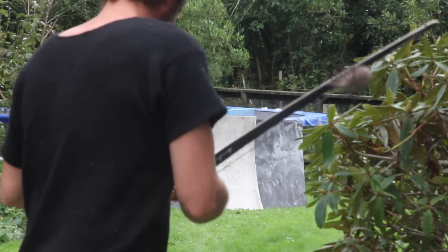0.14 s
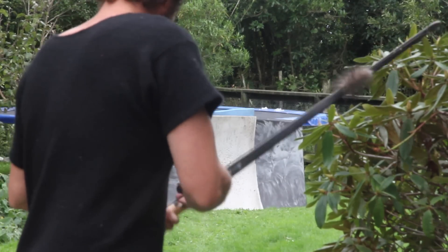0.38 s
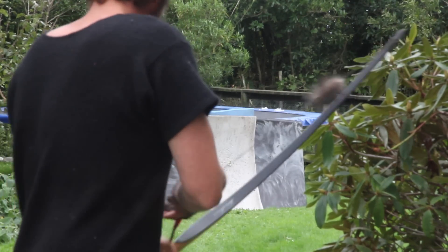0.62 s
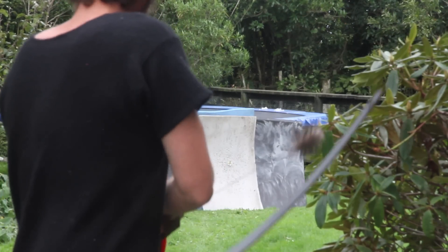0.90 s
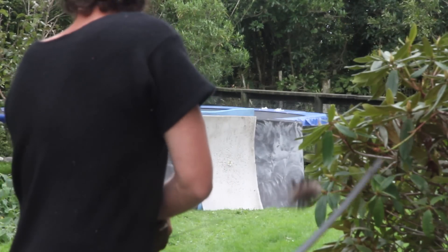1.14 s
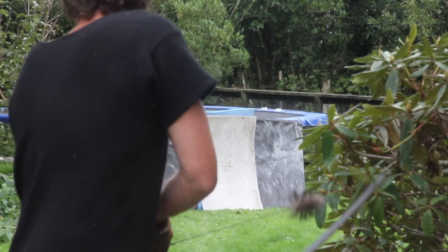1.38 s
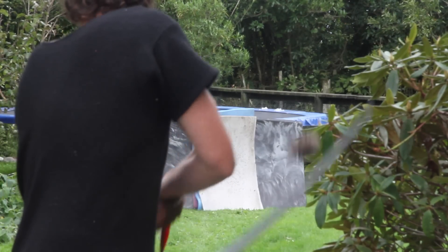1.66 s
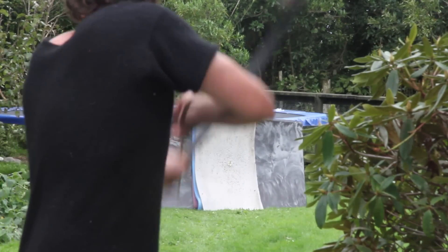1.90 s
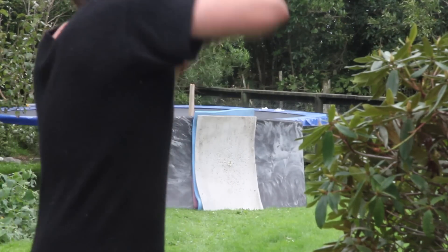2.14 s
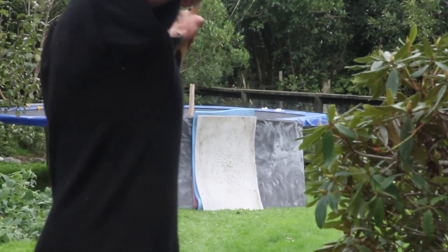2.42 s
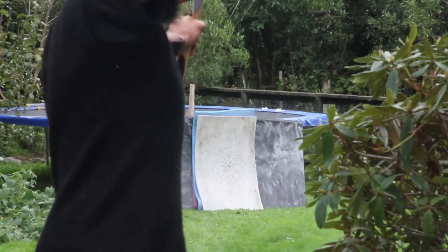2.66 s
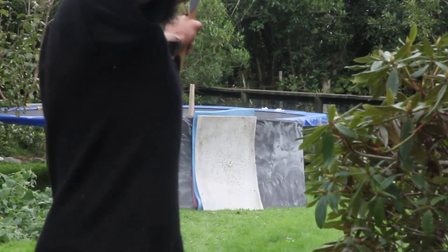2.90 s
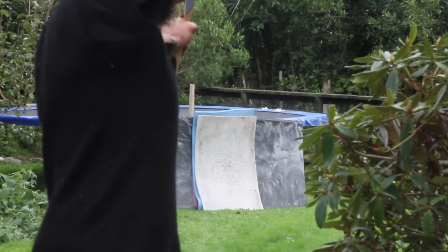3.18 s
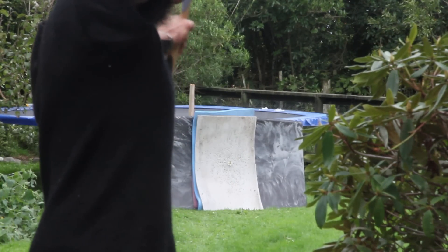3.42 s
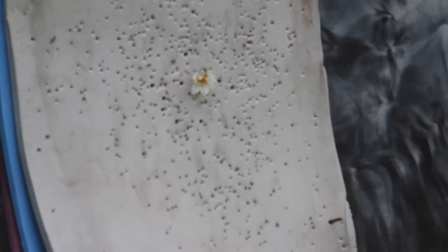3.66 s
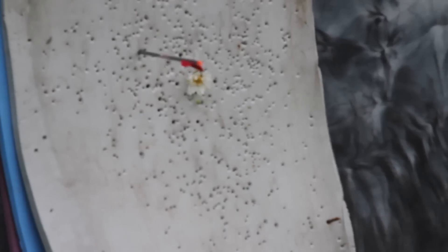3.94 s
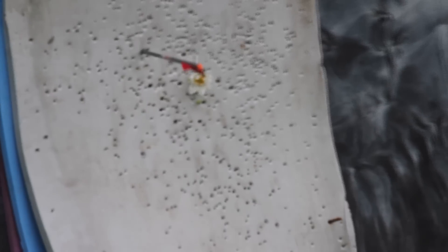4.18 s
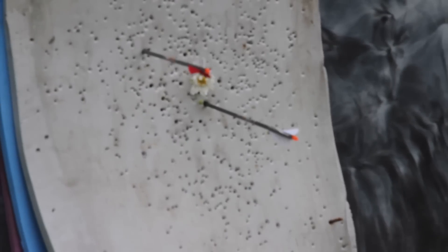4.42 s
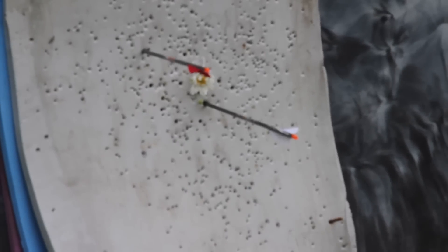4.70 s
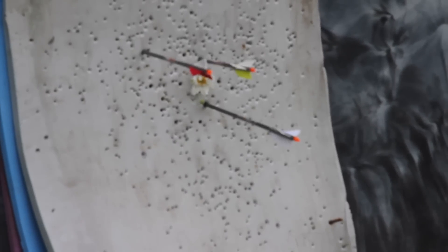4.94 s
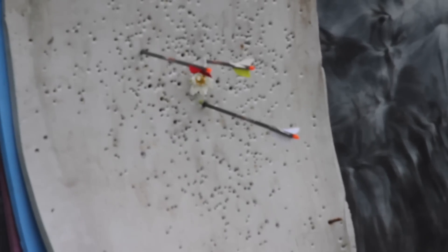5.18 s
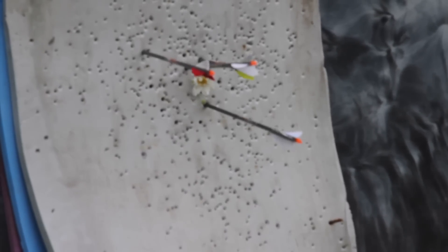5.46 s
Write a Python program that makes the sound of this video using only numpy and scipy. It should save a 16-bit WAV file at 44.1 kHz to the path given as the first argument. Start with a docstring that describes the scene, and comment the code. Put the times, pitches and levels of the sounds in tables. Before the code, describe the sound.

In a quiet garden with faint far wind and traffic, an archer's clothing and arrow fletchings rustle and snap dryly, wood and nocks tick and knock, then fall nearly quiet. The string releases with a loud sharp crack. After an abrupt cut, an arrow smacks into the target close to the microphone, overloading it, while wind hisses, thumps and tears, easing and then surging again at the end.

```python
"""Cloth rustles and snaps, wood and nocks tick, and a string is loosed as an archer handles a bow in a garden.
After a cut at 3.74 s, close to the butt, an arrow smacks in and overloads the input while gusts hiss and thump.
Handling is shaped noise and noise bursts; wood and butt are noise rung through damped modes, or decaying sines.
Wind is fluttering hiss, short uneven low swings, pressure steps and lumpy rumble over banded garden noise."""
import sys
import numpy as np
from scipy import signal
from scipy.io import wavfile

SR = 44100
rng = np.random.default_rng(int(sys.argv[2]) if len(sys.argv) > 2 else 0)


def to_wav(sig):
    """Store sig (one row per channel, or 1-D mono) as 16-bit WAV at the path in sys.argv[1].

    Samples outside -1..1 are clipped; the rate is SR.
    """
    pcm = np.clip(np.atleast_2d(sig), -1, 1) * 32767
    pcm = np.round(pcm).astype(np.int16)
    wavfile.write(sys.argv[1], SR, pcm.T)  # frames by channels


def rack_gain(trim_db):
    """Turn a fader trim in dB into the linear factor to multiply a signal by."""
    fader = np.asarray(trim_db, float)
    return 10 ** (fader / 20)


N = 246078  # samples

# Knocks of bow, string and shafts, before the part gains.
# Each row: start in seconds, level in dB, woody part in dB re level, bright part in dB re level.
KNOCKS = [(0.2807, -35.5, 2, -14), (0.2954, -35, 4.5, -16), (1.0248, -35, 2.5, -17),
          (1.1548, -28.5, -6, -41), (1.232, -31.5, -12, -27), (1.4805, -46, 12, -18),
          (1.4953, -34, 6.5, -22), (1.582, -21.5, 3.5, -6.5), (1.595, -24, -8, -24), (1.6219, -29, -3, -18),
          (1.6329, -27, -10, -5.5), (1.735, -35.5, 3, -17), (1.835, -20, -7, -11), (1.858, -23, -6.5, -21),
          (1.9295, -26, -10, -11), (1.9604, -24, -3.5, -27), (1.9688, -18.5, -9, -33),
          (2.001, -23, -5, -27), (2.0298, -21.5, -20, -33), (2.188, -27.5, -5, -15),
          (2.2477, -26, -12.5, -32), (2.3152, -30.5, -4, -8), (2.7194, -30, -25, -1.5),
          (3.107, -35, -11, -3.5), (3.469, -19.5, -9, 5), (3.478, -6.5, -2.5, -4.5),
          (3.486, -11.5, -28, -1.5)]
KNOCK_T60_S = 0.028
# Modes of the wooden stave. Each row: frequency in Hz, gain in dB, t60 in seconds.
STAVE_MODES = [(900, 0, .012), (1150, -1, .014), (1500, 0, .01), (1850, -3, .008), (2300, -3, .008)]
# Small hollow knocks with one clear pitch. Each row: start in seconds, peak in dB, frequency in Hz.
HOLLOW_KNOCKS = [(1.0248, -31, 1050), (1.4802, -33, 1290), (1.5821, -19, 890), (1.734, -34, 800),
                 (3.1057, -24, 1130)]
HOLLOW_T60_S = 0.027
# The limbs jolt back as the string stops.
# Each row: start in seconds, level in dB, frequency in Hz, t60 in seconds.
LIMB_JOLT = [(3.4802, -10.5, 306, 0.028)]
# Arrow into the butt and its echoes. Each row: start in seconds, push level in dB.
ARROW_HITS = [(3.9152, 1), (3.93, -22), (3.934, -20), (3.945, -25.5), (3.954, -25)]
# Modes of the butt. Each row: frequency in Hz, gain in dB, t60 in seconds.
BUTT_MODES = [(1000, -1, .008), (1400, -7, .006), (2000, -3, .008), (2240, -6, .012), (2950, -7, .006),
              (4200, -2, .005), (6600, -10, .004)]
# Dry bright snaps of cloth and fletching. Each row: start in seconds, noise level in dB, centre in Hz.
CLOTH_SNAPS = [(0.0564, -36, 12000), (0.1674, -33, 7000), (0.3345, -23.5, 9000), (0.372, -25.5, 8000),
               (0.3984, -20, 9250), (0.4114, -24, 9000), (0.4286, -28, 9000), (0.4834, -19, 6900),
               (0.5114, -22, 9500), (0.5205, -16.5, 8900), (0.5682, -23, 13000), (0.6978, -27.5, 8000),
               (0.7442, -23.5, 6000), (0.772, -22, 7000), (0.8138, -27.5, 9900), (2.031, -18.5, 5940),
               (2.09, -37, 6500), (2.118, -39, 10100), (2.1655, -28, 7850)]
SNAP_SPREAD, SNAP_T60_S, SNAP_TAIL_DB = 1.39, 0.0051, -12  # centre-to-edge ratio, fade, scrapy tail
# Hands at work, with faint crackles at random. Each row: start in seconds, end in seconds.
BUSY_HANDS = [(.2, .9), (1.8, 2.35)]
CRACKLES_PER_S, CRACKLE_FLOOR_DB = 40, -36
# Strokes of sleeve, shaft and string, before the flutter.
# Each row: peak in seconds, level in dB, brighter part in dB re level, rise in seconds, t60 in seconds.
HAND_STROKES = [(0.28, -48.5, -10, 0.12, 1.1), (0.58, -45.5, 4.5, 0.44, 0.68),
                (0.77, -50.5, 4.5, 0.39, 0.47), (0.923, -47, 17, .008, 0.46), (0.945, -40.5, 9, .05, 0.26),
                (1.34, -48, -4, 0.23, 0.24), (1.5, -47, -13, .07, .5), (1.63, -39.5, -3, 0.091, .35),
                (1.84, -35, -10, .03, 0.27), (1.96, -40.5, -25, 0.035, 1.5), (2.11, -54, -9, .1, 1.4),
                (3.463, -25.5, -6.5, .006, 0.32), (3.484, -27, 0, 0.042, 0.11)]
STROKE_RISE_DB, SHEEN_SLOPE_RATIO = 29.5, 1.9  # climb over the rise; brighter part's dB slope re the duller
# Wind hiss in the leaves near the butt, before drops and flutter; close rows are sudden steps.
# Each row: time in seconds, level in dB.
GUST_HISS = [(3.74, -56), (3.744, -35), (3.79, -41), (3.85, -39.5), (3.91, -27.5), (3.99, -33),
             (4.085, -32.5), (4.138, -30), (4.145, -28), (4.2, -28.5), (4.31, -35), (4.315, -39),
             (4.5, -44.5), (4.75, -47.5), (4.79, -42), (4.92, -43.5), (5.178, -41), (5.183, -37.5),
             (5.23, -34.5), (5.298, -36), (5.303, -40), (5.58, -40.5)]
GUST_SHEEN_DB, GUST_TEAR_DB = -3, -1  # re the hiss
# The hiss drops away for a moment after the hardest blows.
# Each row: start in seconds, end in seconds, level change in dB.
HISS_DROPS = [(3.922, 3.963, -11), (4.023, 4.083, -13), (5.371, 5.42, -18), (5.483, 5.59, -12)]
LEAVES_DB, LEAVES_SHEEN_DB = -54, -58.5  # faint steady leaves, duller and brighter part, before the flutter
# Wind thumps on the diaphragm, before trim and random wander of level and pitch.
# Each row: centre in seconds, level in dB, swing in Hz, width in milliseconds, tearing in dB.
WIND_THUMPS = [(3.64, -33, 116, 11.5, -65), (3.77, -11.5, 154.7, 27, -34.5), (3.818, -13.5, 186, 6.9, -49),
               (3.836, -21, 159, 14.5, -45), (3.874, -10, 131, 10.3, -36), (3.903, -7, 187.7, 13.5, -32),
               (3.958, -19.5, 234, 9.4, -33), (4.038, -4.5, 373.4, 21.4, -22),
               (4.071, -9.5, 187, 12, -32.5), (4.097, -8, 376, 9, -40), (4.11, -7.5, 148, 13, -40),
               (4.27, -19, 94, 16, -51), (4.303, -16.5, 178, 7.3, -44), (4.385, -11.5, 137, 15.2, -50),
               (4.427, -24.5, 132, 12.4, -51), (4.482, -13.5, 146.3, 13.3, -37),
               (4.608, -28, 129, 10.4, -40), (4.645, -31.5, 137.5, 16, -39), (4.814, -21, 131, 10.3, -41),
               (4.851, -22, 131, 11.8, -38.5), (5.138, -13, 160, 7.6, -44), (5.309, -19.5, 154, 14, -50),
               (5.365, -6.5, 223, 10.6, -23.5), (5.437, -11.5, 166.4, 11, -52), (5.487, -3, 252, 15.5, -38),
               (5.513, -6.5, 260, 12.1, -23), (5.533, -9, 299, 9.7, -13.5), (5.555, -9.5, 183, 11.9, -19)]
FAINT_THUMPS, FAINT_FROM_S, FAINT_FLOOR_DB, FAINT_WIDTH_MS = 10, 3.7, -39, 11  # scattered at random
# Sudden pressure jumps at the front of a gust, before softening.
# Each row: start in seconds, level in dB, decay time constant in milliseconds.
PRESSURE_JUMPS = [(3.905, -6.5, 0.87), (4.372, -17, 2.0), (5.132, -15, 0.98), (5.361, -11, 3.2),
                  (5.482, 6.5, 1.4), (5.5167, -10.5, 1.3), (5.539, -12, 0.67)]
# Low wind rumble, before a trim. Each row: time in seconds, level in dB.
WIND_RUMBLE = [(3.6, -54), (3.774, -20), (3.802, -26), (3.902, -16.5), (3.94, -29), (4.126, -24.5),
               (4.17, -42), (4.286, -24.5), (4.33, -54), (4.386, -24), (4.424, -35.5), (4.782, -41.5),
               (4.852, -29), (4.99, -54), (5.156, -25), (5.21, -48), (5.496, -32), (5.575, -15.5)]
# Tone of the far garden. Each row: frequency in Hz, relative density in dB per Hz.
GARDEN_TONE = [(18, -45), (30, -22), (91, 0), (151, -7.5), (315, 2), (401, 0), (448, -0.5), (639, -4.5),
               (798, -4.5), (2070, -17), (6000, -38), (7800, -55), (13200, -120)]
GARDEN_DB = -39.5  # rms, before the small shelter trim


def rms_one(x):
    """Scale to rms 1."""
    return x / np.sqrt(np.mean(x ** 2) + 1e-20)


def in_time(rows):
    """Columns of a curve, interpolated sample by sample."""
    s, *columns = np.transpose(rows)
    return [np.interp(np.arange(N) / SR, s, column) for column in columns]


def band(x, low_hz, high_hz, order=2):
    """Butterworth band-pass."""
    edges = [low_hz, min(high_hz, .45 * SR)]
    return signal.sosfilt(signal.butter(order, edges, "band", fs=SR, output="sos"), x)


def drift(rate):
    """Slow random wander of spread about 1: noise through two equal poles, drawn every 40 samples."""
    pole = np.exp(-80 * np.pi * rate / SR)
    noise = rng.standard_normal(N // 40 + 2002)
    slow = signal.lfilter([1], [1, -2 * pole, pole * pole], noise)[2000:]
    return np.interp(np.arange(N) / 40, np.arange(len(slow)), rms_one(slow - slow.mean()))


def ring(x, modes):
    """Parallel damped modes of one body."""
    out = np.zeros(N)
    for hz, db, t60 in modes:
        radius = rack_gain(-60 / (t60 * SR))
        angle = 2 * np.pi * hz / SR
        poles = [1, -2 * radius * np.cos(angle), radius * radius]
        out += rack_gain(db) * signal.lfilter([0, np.sin(angle)], poles, x + 1e-18)
    return out


def add(out, s, piece):
    """Mix a piece in at a time in seconds."""
    i = max(round(s * SR), 0)
    out[i:i + len(piece)] += piece[:N - i]


def ticks():
    """Each tick is a dying puff of noise with a scrapy tail: one part rings the stave, the rest is crack."""
    woody, middle, bright = np.zeros((3, N))
    t = np.arange(6000) / SR
    noises = rng.standard_normal((len(KNOCKS), 3, len(t)))
    for (s, db, woody_db, bright_db), noise in zip(KNOCKS, noises):
        fall_db = -60 * t / KNOCK_T60_S
        fall = rack_gain(fall_db) + rack_gain(-14.5 + fall_db / 10)
        noise = np.where(t < .0002, 1.5 * np.sign(noise), .6 * noise)  # hard first contact
        puff = fall * np.clip(noise, -1.5, 1.5)
        add(middle, s, rack_gain(db) * puff[0])
        add(woody, s, rack_gain(db + woody_db) * puff[1])
        add(bright, s, rack_gain(db + bright_db) * puff[2])
    stave = rack_gain(-19.5) * band(ring(woody, STAVE_MODES), 730, 5400)
    crack = rack_gain(6) * band(middle, 1800, 4520)
    return stave + crack + rack_gain(2.5) * band(bright, 3800, 13500)


def tocks():
    """Each hollow knock is a single wooden mode dying away as a sine."""
    out, t = np.zeros(N), np.arange(3000) / SR
    for s, db, hz in HOLLOW_KNOCKS:
        add(out, s, rack_gain(db - 60 * t / HOLLOW_T60_S) * np.sin(2 * np.pi * hz * t))
    return out


def jolt():
    """One low knock of the limbs: a short push into a mode and a faster-dying one above it."""
    (s, db, hz, t60), = LIMB_JOLT
    push = np.zeros(N)
    add(push, s, np.hanning(24) / 12)
    modes = [(hz, db, t60), (hz * 1.2, db - 0.5, t60 / 5)]
    return band(ring(push, modes), 99, 3400)


def smack():
    """The shaft digs in for about 3 ms: a rough push into the modes of the butt, with a crack on top."""
    push, t = np.zeros(N), np.arange(1600) / SR
    noises = rng.standard_normal((len(ARROW_HITS), len(t)))
    for (s, db), noise in zip(ARROW_HITS, noises):
        dig = rack_gain(db - 60 * t / 0.019)
        tail = rack_gain(db - 22 - 60 * t / 0.062)
        add(push, s, (dig + tail) * noise)
    body = rack_gain(-11.5) * ring(push, BUTT_MODES)
    crack = rack_gain(-0.5) * band(push, 3400, 22000)
    return body + crack + rack_gain(8) * band(push, 640, 4000)


def snaps():
    """Each snap or random crackle is a short burst of noise in a band of its own."""
    rows = list(CLOTH_SNAPS)
    for start, end in BUSY_HANDS:
        for when, size, pitch in rng.random((round(CRACKLES_PER_S * (end - start)), 3)):
            rows.append((start + (end - start) * when, CRACKLE_FLOOR_DB + 8 * size, 3000 * 4 ** pitch))
    out, t = np.zeros(N), np.arange(3000) / SR
    fall = rack_gain(-60 * t / SNAP_T60_S) + rack_gain(SNAP_TAIL_DB - 6 * t / SNAP_T60_S)
    for (s, db, hz), noise in zip(rows, rng.standard_normal((len(rows), len(t)))):
        burst = fall * np.clip(noise, -1.5, 1.5)
        add(out, s, rack_gain(db) * band(burst, hz / SNAP_SPREAD, hz * SNAP_SPREAD))
    return out


def hiss_db():
    """Level of the wind hiss, with its short drops."""
    level_db, = in_time(GUST_HISS)
    for s, until, db in HISS_DROPS:
        level_db[round(s * SR):round(until * SR)] += db
    return level_db


def rustle():
    """Strokes, leaves and gusts as grainy hiss, a duller and a brighter part sharing one flutter."""
    t, wind_db = np.arange(N) / SR, hiss_db()
    by_archer = t < GUST_HISS[1][0]  # the steady leaves stop at the cut
    body_power = rack_gain(2 * LEAVES_DB) * by_archer + rack_gain(2 * wind_db)
    sheen_power = rack_gain(2 * LEAVES_SHEEN_DB) * by_archer + rack_gain(2 * (wind_db + GUST_SHEEN_DB))
    for s, db, bright_db, rise, t60 in HAND_STROKES:
        rise_db = STROKE_RISE_DB * (t - s) / rise
        fall_db = 60 * (s - t) / t60
        shape_db = np.maximum(np.where(t < s, rise_db, fall_db), -99)
        body_power += rack_gain(2 * (db + shape_db))
        sheen_power += rack_gain(2 * (db + bright_db + SHEEN_SLOPE_RATIO * shape_db))
    # sample-by-sample random peaks give the hiss its fine crackle
    grain = rack_gain(1.95 * np.minimum(rng.exponential(1, N), 4)) * rng.standard_normal((2, N))
    flutter_db = 1.64 * drift(18)
    body = rms_one(band(grain[0], 890, 4810))
    sheen = rms_one(band(grain[1], 3800, 14700))
    return rack_gain(flutter_db) * (np.sqrt(body_power) * body + np.sqrt(sheen_power) * sheen)


def thumps():
    """An eddy swings the diaphragm a few uneven times; a jump early in a swing silences what precedes it."""
    out = np.zeros(N)
    wander, lumps = drift(54.8), drift(158)
    rows = [row[:4] for row in WIND_THUMPS]
    for when, size, pitch in rng.random((FAINT_THUMPS, 3)):
        s = FAINT_FROM_S + when * (N / SR - FAINT_FROM_S)
        rows.append((s, FAINT_FLOOR_DB + 4 * size, 130 * 4 ** pitch, FAINT_WIDTH_MS))
    for (s, db, hz, width_ms), start in zip(rows, rng.uniform(0, 2 * np.pi, len(rows))):
        size = round(2.3 * width_ms * SR / 1000)
        i = min(round(s * SR) - size // 2, N - size)
        bend = wander[i:i + size] - wander[i:i + size].mean()
        phase = start + 2 * np.pi * np.cumsum(hz * np.exp(0.405 * bend)) / SR
        swing = (np.sin(phase) + 0.28 * np.sin(2 * phase)) * np.hanning(size)
        for jump in PRESSURE_JUMPS[1:]:  # the first jump leaves the swings whole
            front = round(jump[0] * SR) - i
            if 0 < front < size // 2:
                swing *= np.clip((np.arange(size) - front) / 60, 0, 1)
        out[i:i + size] += rack_gain(db - 2 + 3.6 * lumps[i:i + size]) * swing
    return out


def jumps():
    """A sharp pressure step down that relaxes within a few milliseconds, softened by a one-pole low-pass."""
    out, t = np.zeros(N), np.arange(1200) / SR
    for s, db, decay_ms in PRESSURE_JUMPS:
        add(out, s, -rack_gain(db) * np.exp(-1000 * t / decay_ms) * np.cos(2 * np.pi * 200 * t))
    return signal.lfilter([.5], [1, -.5], out)


def rumble():
    """Lumpy low noise, and a dark tearing above it that follows the hiss and breaks up on strong thumps."""
    low_db, = in_time([(3.55, -66)] + list(WIND_RUMBLE))
    tear_power = rack_gain(2 * (hiss_db() + GUST_TEAR_DB))
    for s, _, _, width_ms, db in WIND_THUMPS:
        size = round(2.3 * width_ms * SR / 1000)
        add(tear_power, s - size / SR / 2, rack_gain(2 * db) * np.hanning(size))
    lumps_db = 3.6 * drift(31)
    low = rms_one(rack_gain(lumps_db) * band(rng.standard_normal(N), 42.7, 142, order=3))
    tear = rms_one(band(band(rng.standard_normal(N), 250, 1420), 260, 2030))
    # stronger tearing swings further in level, heard as knocks
    ragged_db = np.interp(10 * np.log10(tear_power), [-40, -24], [1.5, 7])
    knocking = rack_gain(ragged_db * (drift(114) - 0.78))
    return rack_gain(low_db - 1) * low + np.sqrt(tear_power) * knocking * tear


def garden():
    """Far wind in trees and distant traffic: half-octave noise bands, each wavering a little."""
    out, white = 0, rng.standard_normal((2, N))
    edges = 30 * 2 ** np.arange(0, 8, .5)
    hz, db = np.transpose(GARDEN_TONE)
    for k, (low, high) in enumerate(zip(edges, edges[1:])):
        level_db = np.interp(np.log(low * high) / 2, np.log(hz), db)
        out = out + rack_gain(level_db + 1.4 * drift(6.9)) * band(white[k % 2], low, high)
    return rack_gain(GARDEN_DB) * rms_one(out)


def scene():
    """All sources, heard by the archer, then, after a cut at 3.74 s, close to the butt."""
    shelter_db, = in_time([(3.7, -1), (3.744, -0.5)])
    handling = ticks() + tocks() + snaps()
    shot = jolt() + smack()
    wind = band(thumps() + jumps(), 39, 19000) + rumble()
    mix = handling + shot + rustle() + wind + rack_gain(shelter_db) * garden()
    return mix[None]


def band_limit(x):
    """A steep low-pass at the top of the band."""
    return signal.sosfilt(signal.butter(12, 16240, fs=SR, output="sos"), x)


def record(dry):
    """The microphone rolls off at the very top and the input clips just under full scale."""
    dull = signal.sosfilt(signal.butter(10, 15200, fs=SR, output="sos"), dry)
    clipped = np.clip(dull, -.98, .98)
    return band_limit(clipped)


dry = scene()
out = record(dry)
to_wav(out)
```